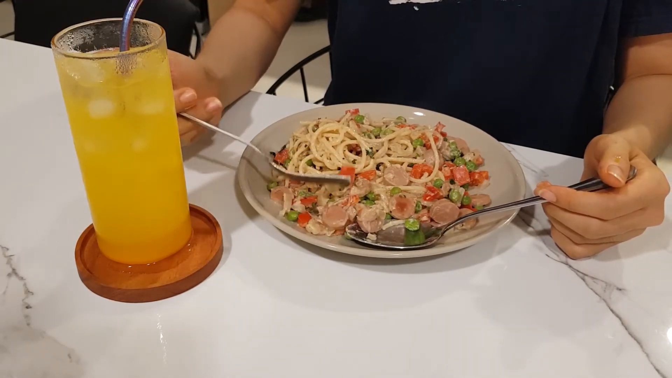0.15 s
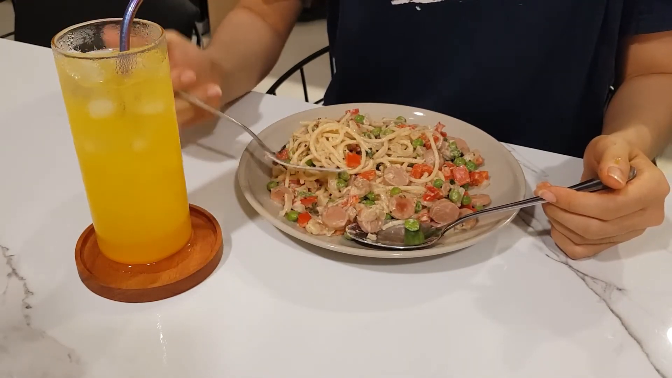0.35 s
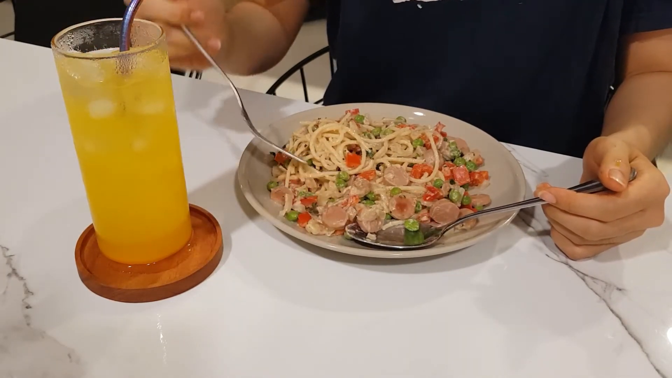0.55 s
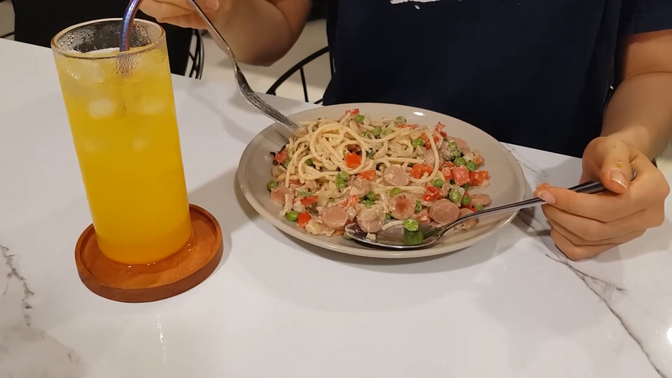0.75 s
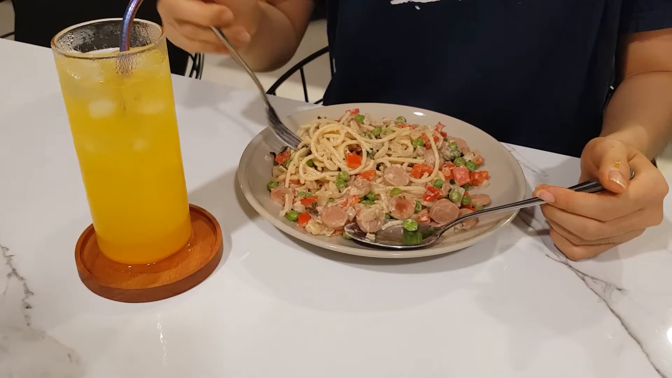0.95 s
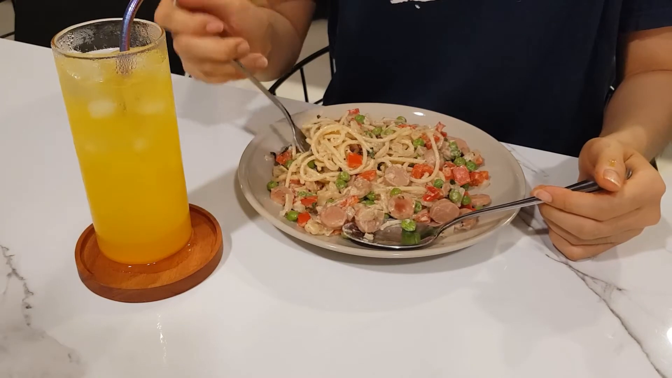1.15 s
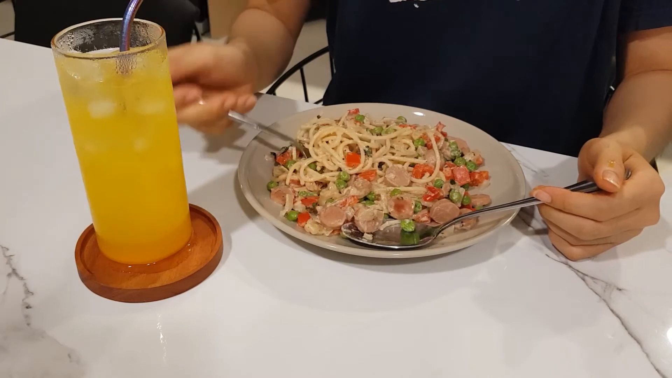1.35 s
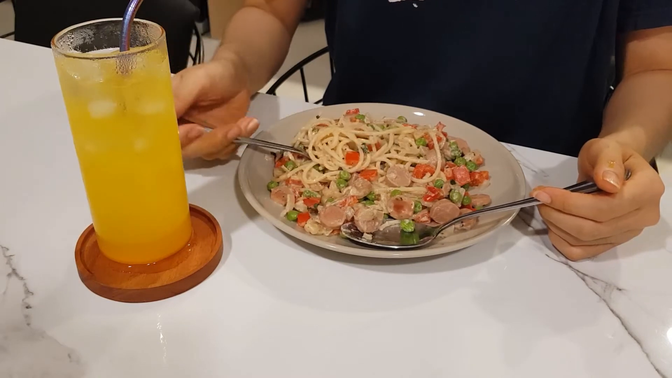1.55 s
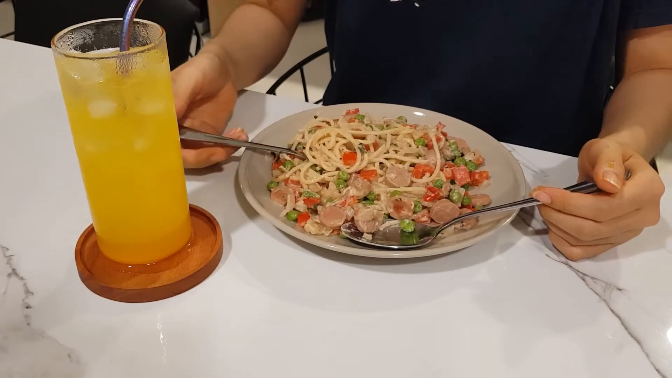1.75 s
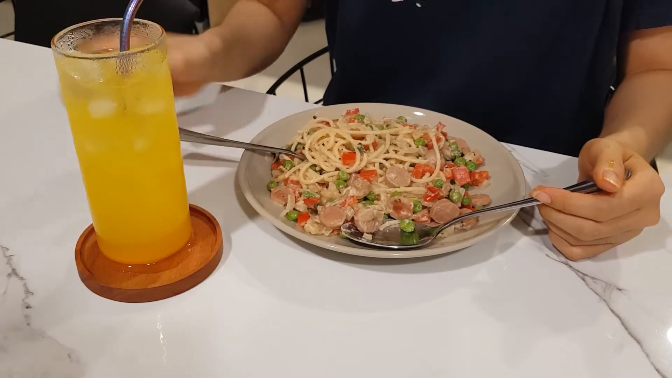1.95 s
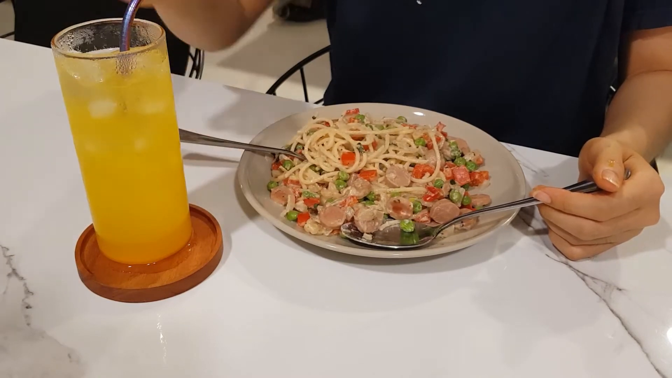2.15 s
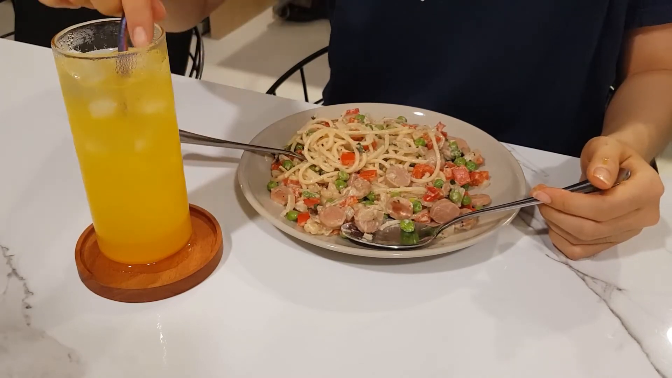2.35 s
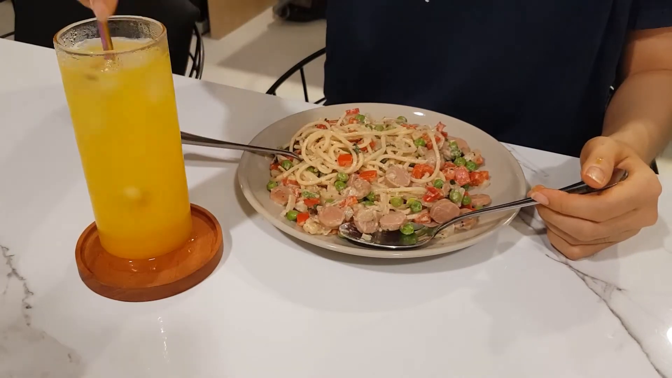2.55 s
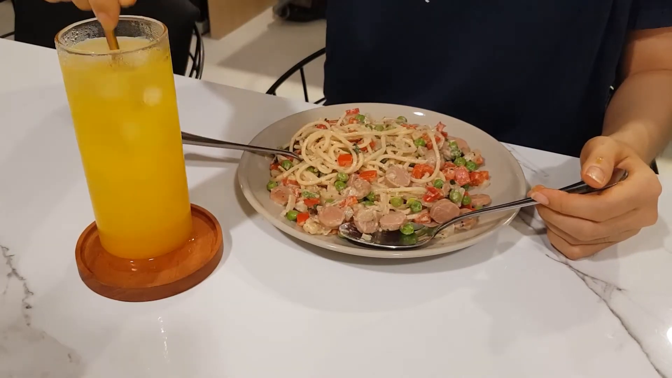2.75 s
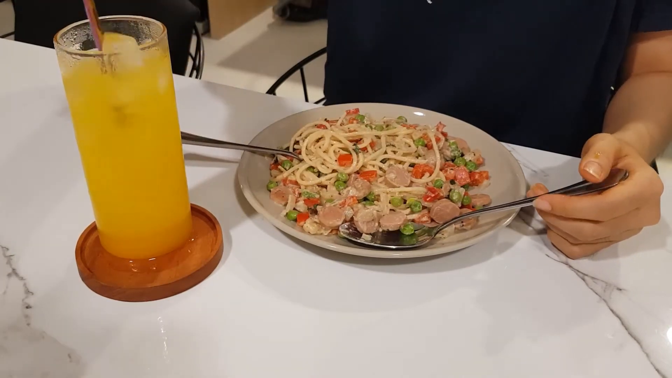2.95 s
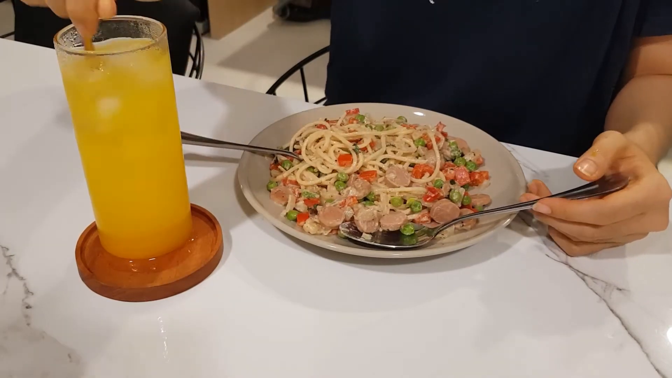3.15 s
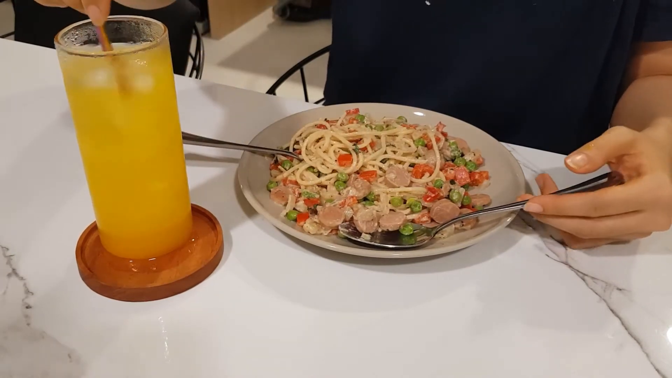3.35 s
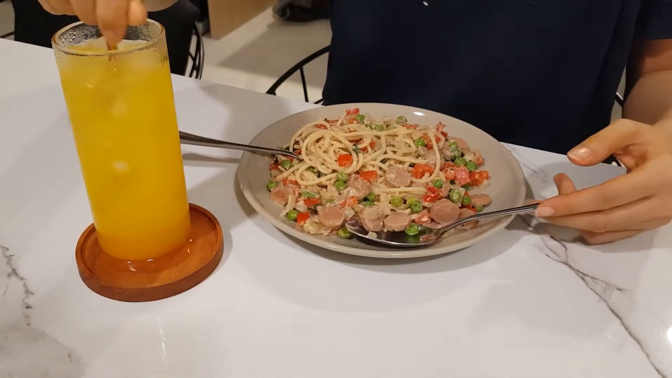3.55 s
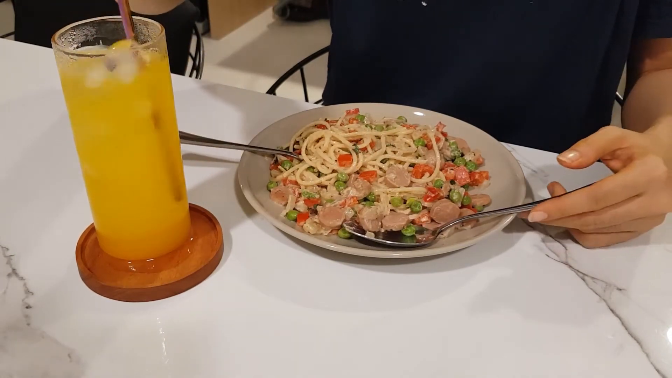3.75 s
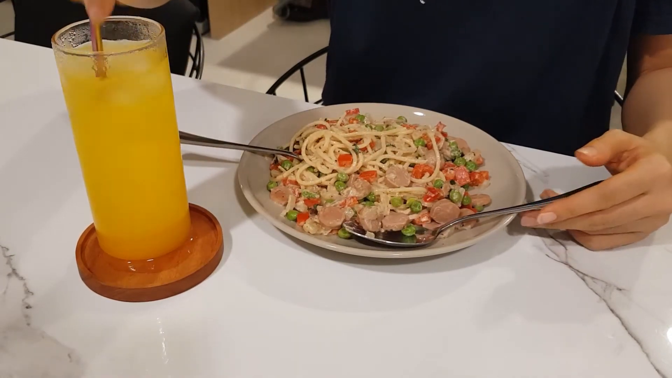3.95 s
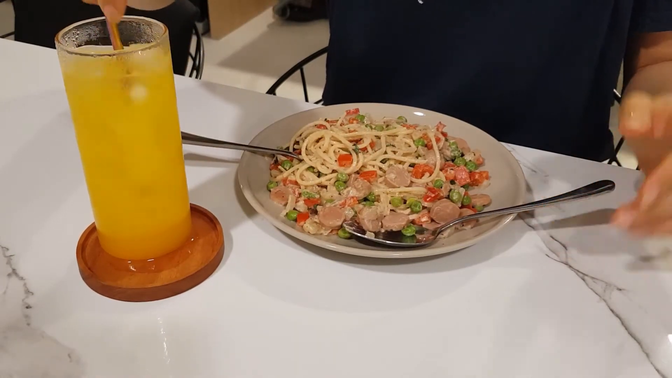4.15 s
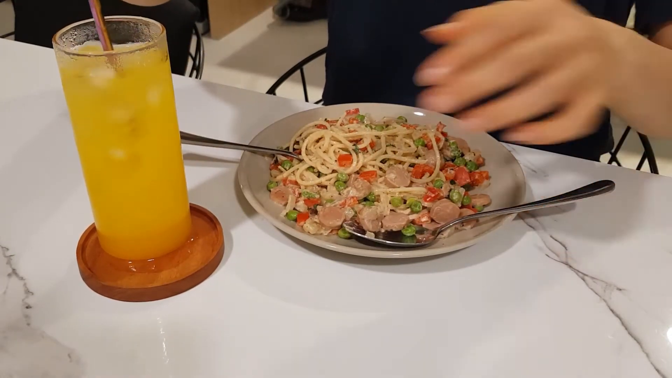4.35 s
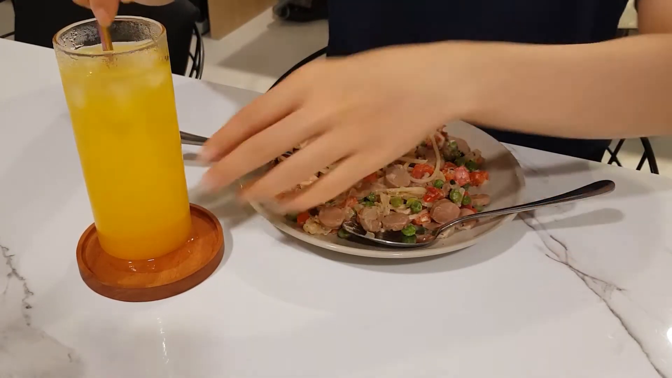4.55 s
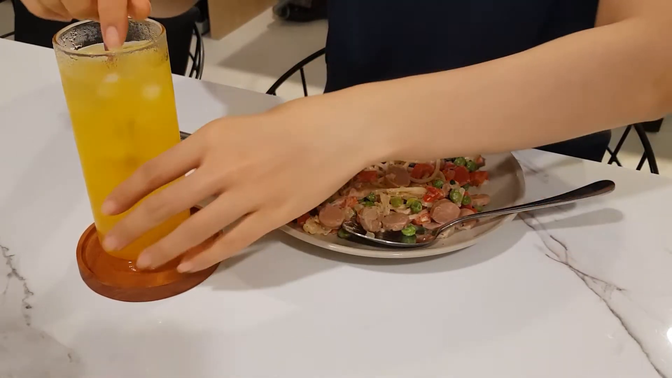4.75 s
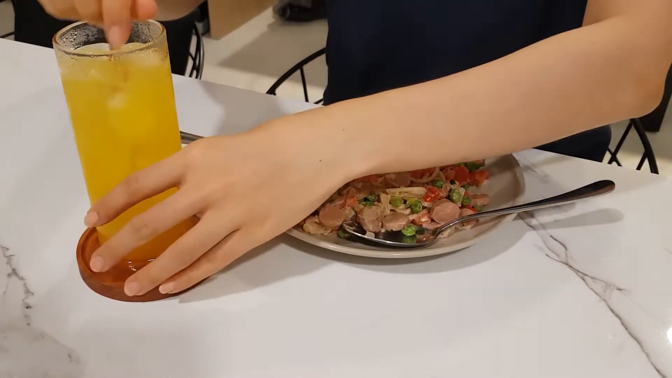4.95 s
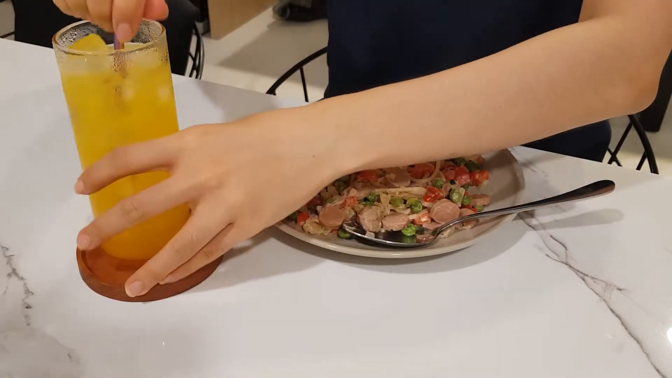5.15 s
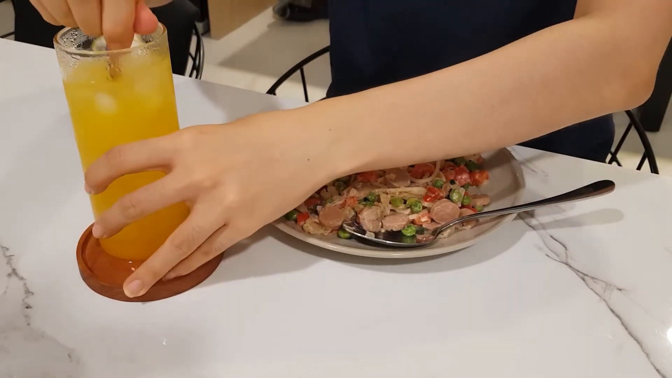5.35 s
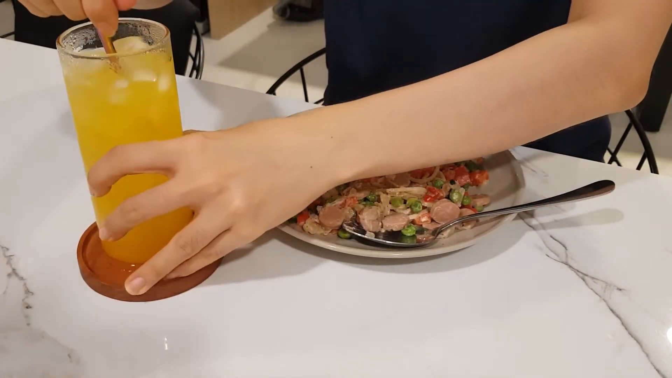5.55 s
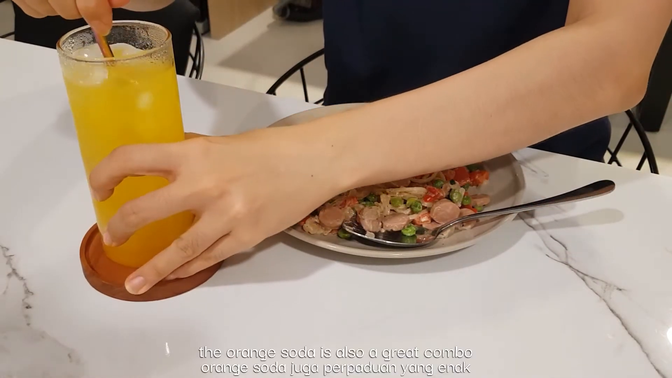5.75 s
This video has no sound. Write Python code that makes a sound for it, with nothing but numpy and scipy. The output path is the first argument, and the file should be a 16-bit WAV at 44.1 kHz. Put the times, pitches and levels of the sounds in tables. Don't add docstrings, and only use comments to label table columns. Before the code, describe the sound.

Ice cubes crack and clink in a full glass stirred with a metal straw, after a quiet start with faint cutlery taps.

```python
import sys
import numpy as np
from scipy import signal
from scipy.fft import rfft, irfft, next_fast_len
from scipy.io import wavfile
from scipy.ndimage import uniform_filter1d

SR = 44100
rng = np.random.default_rng(int(sys.argv[2]) if len(sys.argv) > 2 else 0)


def bounce(signal):
    frames = np.transpose(np.atleast_2d(signal))
    limited = np.clip(frames, -1, 1)
    pcm = np.round(limited * 32767).astype(np.int16)
    wavfile.write(sys.argv[1], SR, pcm)


def makeup_ratio(level_db):
    decades = np.asarray(level_db, float) / 20
    return 10 ** decades


N = 255339


def clock(n):
    return np.arange(n) / SR


def evened(x):
    return x / np.sqrt(np.mean(x ** 2) + 1e-20)


def peaked(x):
    return x / np.abs(x).max()


def read(points, hz):
    f, value = np.transpose(points)
    return np.interp(np.log(hz + 1), np.log(f + 1), value)


def add(mix, s, sound):
    part = mix[round(s * SR):][:len(sound)]
    part += sound[:len(part)]


def resonate(x, hz, width):
    r = np.exp(-np.pi * width / SR)
    return signal.lfilter([1 - r * r, 0, r * r - 1], [2, -4 * r * np.cos(2 * np.pi * hz / SR), 2 * r * r], x)


def colour(x, points):
    size = next_fast_len(N)
    gain = makeup_ratio(read(points, np.fft.rfftfreq(size, 1 / SR)))
    return irfft(rfft(x, size) * gain, size)[..., :N]


def decay(t60, t):
    return makeup_ratio(-60 * t / t60)


def ring(hz, t60, t):
    return np.sin(2 * np.pi * hz * t) * decay(t60, t)


def brushes(table, relative_width):
    out, t = np.zeros(N), clock(9000)
    for s, db, hz, length in table:
        rub = evened(resonate(rng.standard_normal(len(t)), hz, relative_width(hz)))
        add(out, s - .1, makeup_ratio(db) * rub * np.exp(-((t - .1) / length) ** 2 * 2))
    return out


# f/Hz, density/dB per Hz
AIR = [(33, -34), (41, -4), (100, -15.5), (200, -9), (330, -14), (600, -20.5), (1000, -27.5), (1900, -18),
       (2600, -20.5), (3500, -31.5), (7500, -39), (8300, -42.5), (9400, -37.5), (13000, -32.5)]
# f/Hz, correlation [0..1]
LIKENESS = [(40, 0.78), (130, 0.97), (300, 0.8), (600, 0.074), (1400, 0.49), (2200, 0.59), (4000, 0.079),
            (15000, 0.033)]
# f/Hz, left minus right/dB
TILT = [(60, -2.5), (240, -2), (950, -1), (3770, 1.5), (15000, -2)]
# f/Hz, phase/radians
LEAD = [(60, 0.61), (600, -1.22), (2200, -2.09), (4000, -2)]
# f/Hz, width/Hz, level/dB
HUM = [(86.6, 13, -80.5), (117, 28, -77.5), (175, 3.7, -78.5), (244.3, 29, -80.5)]
# f/Hz, width/Hz, level/dB
INSECTS = [(2123, 88, -65.5), (2153, 21, -77.5), (2219, 14.6, -66), (2251, 62, -67), (2380, 13, -78.5)]


def background():
    a, b = rng.standard_normal((2, N))
    size = next_fast_len(N)
    hz = np.fft.rfftfreq(size, 1 / SR)
    same = np.clip(read(LIKENESS, hz), -1, 1)
    tilt, lead = makeup_ratio(read(TILT, hz) / 2), np.exp(1j * read(LEAD, hz))
    left = tilt * lead * rfft(a, size)
    right = (same * rfft(a, size) + np.sqrt(1 - same ** 2) * rfft(b, size)) / tilt
    pair = irfft([left, right], size)[:, :N]
    swell = evened(uniform_filter1d(uniform_filter1d(rng.standard_normal(N), 3000), 3000))
    air = makeup_ratio(-67) * evened(colour(pair, AIR))
    air += makeup_ratio(-96.0 + 11.0 * swell) * evened(resonate(resonate(pair[::-1], 720, 490), 500, 700))
    for f, width, db in HUM + INSECTS:
        air += makeup_ratio(db) * evened(resonate(resonate(pair, f, width), f, 3 * width))
    return air


# t/s, peak level/dB, f/Hz
FORK = [(0.0294, -66, 1890), (0.2794, -68, 1520), (0.4468, -62.5, 1260), (0.9294, -73, 1390),
        (1.2194, -70, 1300), (1.4894, -62.5, 1220), (2.1594, -65, 1660), (2.2628, -54.5, 1180),
        (.447, -56, 2250)]


def fork_taps():
    out, t = np.zeros(N), clock(9000)
    for s, db, hz in FORK:
        push = rng.standard_normal(len(t)) * (decay(0.016, t) + makeup_ratio(-1) * decay(0.2, t))
        add(out, s, makeup_ratio(db) * peaked(resonate(resonate(push, hz, 910), hz, 910)))
    return out


# t/s, level/dB, f/Hz, length/s
SCUFFS = [
    (0.288, -76, 640, 0.07),
    (0.755, -76.5, 423, 0.079),
    (0.957, -76.5, 506, 0.075),
    (1.23, -71.5, 390, 0.05),
    (2.195, -76.5, 746, 0.062),
]


def far_scuffs():
    return brushes(SCUFFS, lambda hz: 0.39 * hz)


# t/s, level/dB, f/Hz, length/s
RUSTLE = [
    (1.116, -78, 9300, 0.023),
    (1.168, -74, 13000, 0.043),
]


def sleeve_rustle():
    return brushes(RUSTLE, lambda hz: 1200)


# t/s, vigour level/dB, crowding of the cubes on the wall/dB
STIR = [(2.55, -83, 10.5), (2.656, -69, -23), (2.804, -70.5, -5), (2.9, -51, -2), (3.045, -52.5, 1),
        (3.372, -49, -1), (3.62, -52, -21), (3.74, -47.5, -21), (4.084, -58.5, 3), (4.204, -45.5, -0.5),
        (4.33, -57, -9), (4.48, -55, -3), (4.866, -73.5, -35), (5.11, -67.5, 6.5), (5.2, -53, 0.5),
        (5.368, -47.5, -10), (5.548, -54, -3), (5.79, -62, 3)]
# f/Hz, density/dB per Hz
RATTLE = [(530, -23.5), (900, -8.5), (1130, -24.5), (1720, -12.5), (2360, -9), (3100, -10.5), (3650, -17),
          (4200, -9.5), (4980, -7), (5480, -20), (6180, -8.5), (6970, -16), (11600, -16), (14700, -28.5),
          (15700, -27), (16400, -54)]
# f/Hz, width/Hz, level/dB
GLASS = [(2340, 57, 23), (2590, 480, 4), (2980, 60, -12), (4570, 220, -13), (4985, 235, 6),
         (5600, 200, -15)]
# f/Hz, width/Hz
LOW_WALL = (815, 320)


def stir():
    s, rattle_db, crowd_db = np.transpose(STIR)
    wall_db = rattle_db + crowd_db
    low_db = -28 + 0.67 * rattle_db + 2.0 * crowd_db
    t = clock(N)

    def level(db):
        return makeup_ratio(np.interp(t, s, db, left=-120))

    strength = makeup_ratio(1.4 * np.minimum(rng.exponential(1, N), 3))
    ticks = strength * (rng.random(N) < 2200 / SR)
    grit = signal.lfilter([1], [1, -.98], ticks) * rng.standard_normal((3, N))
    wall = sum(makeup_ratio(d) * np.sqrt(40 / w) * resonate(grit[0], f, w) for f, w, d in GLASS)
    glass = level(wall_db) * evened(wall) + level(low_db) * evened(resonate(grit[0], *LOW_WALL))
    face = np.repeat(rng.integers(0, 9, N // 128 + 1), 128)[:N]
    faces = 0
    for k, hz in enumerate(np.geomspace(2000, 14000, 9)):
        faces = faces + evened(resonate(grit[1:] * (face == k), hz, 0.29 * hz)) * np.sqrt(hz)
    rattle = colour(evened(faces) + 1.6 * evened(grit[1:]), RATTLE)
    rumble = resonate(resonate(grit[0], 266, 45), 240, 350)
    return glass, level(rattle_db) * evened(rattle), level(0.24 * rattle_db - 59.5) * evened(rumble)


# t/s,
# cube ping level/dB, wall ring level/dB, cube f/Hz, crack level/dB
KNOCKS = [(4.74, -51, -51, 4800, -59), (4.7737, -57, -73, 4420, -58), (4.7984, -75, -58, 4420, -78),
          (4.8529, -75, -57, 2940, -82), (4.8629, -69, -51.5, 2850, -72), (4.8851, -69, -61, 2830, -59.5),
          (4.9072, -72, -80, 4760, -57.5), (4.9277, -55, -56, 2820, -58.5), (5.043, -59, -52, 2970, -60.5),
          (5.0654, -61, -49.5, 2950, -64), (5.1287, -61, -53, 6530, -46), (5.1389, -35.5, -34, 4740, -45),
          (5.1684, -43, -53, 4840, -52), (5.1836, -50, -51, 5000, -60), (5.2244, -53, -41, 4970, -56),
          (5.2367, -33.5, -61, 4800, -45), (5.2522, -33, -39, 5090, -37.5), (5.2598, -46, -46, 4500, -57),
          (5.2734, -33.5, -39, 4920, -44), (5.3078, -45, -43, 2970, -61), (5.3361, -28, -40.5, 4560, -54),
          (5.357, -40, -32, 4570, -42), (5.362, -31, -37, 4520, -42), (5.3814, -47, -34, 4470, -45),
          (5.3904, -43, -45, 4500, -43), (5.4194, -50, -38, 4500, -53), (5.453, -31.5, -42, 2960, -50),
          (5.4804, -52, -65, 5000, -59), (5.4945, -30, -45, 4880, -53), (5.5323, -29.5, -51, 4290, -44),
          (5.5387, -32.5, -46, 2740, -52), (5.5667, -41, -47, 4480, -46), (5.5979, -35.5, -50, 4340, -45),
          (5.6357, -42.5, -59, 2980, -57), (5.676, -54, -66, 6200, -58), (5.702, -45, -49, 5100, -48),
          (5.7256, -34, -44.5, 4900, -53), (5.7356, -51, -67, 4600, -46.5), (5.7536, -41, -49.5, 4600, -54),
          (2.587, -70, -62, 2860, -67.5), (2.6, -70, -51, 2980, -63), (2.6188, -44, -45.5, 5150, -49),
         (2.6524, -52, -50, 3000, -60), (2.6754, -51, -55, 5100, -60), (2.7124, -70, -58, 4370, -78),
         (2.7676, -62, -73, 2900, -79), (2.8, -41.5, -49, 4830, -57), (2.86, -48, -56, 2840, -59),
         (2.8857, -61, -47, 2980, -64), (2.8966, -29, -40, 4760, -43.5), (2.9186, -31.5, -44, 5200, -58),
         (2.9245, -33, -45.5, 4540, -44), (2.9581, -30.5, -49.5, 4430, -48), (2.9746, -60, -60, 5010, -52),
         (3, -56, -55, 4470, -41), (3.0205, -52, -45.5, 4650, -52), (3.031, -40, -64, 5100, -44),
         (3.064, -50, -49, 4600, -57), (3.0964, -34.5, -63, 4800, -57), (3.1053, -28.5, -41.5, 2860, -43),
         (3.13, -46, -59, 5050, -55), (3.1418, -29.5, -53, 4550, -43), (3.1556, -36, -49.5, 4600, -43),
         (3.2074, -25.5, -41, 4570, -25), (3.2264, -36, -45.5, 4500, -51), (3.264, -35, -48, 5740, -30.5),
         (3.2784, -32.5, -45, 4600, -35), (3.3194, -50, -62, 2900, -44), (3.3443, -37.5, -55, 5400, -41.5),
         (3.3731, -39, -41.5, 4660, -49), (3.3776, -45, -43, 2930, -48), (3.4052, -41, -53, 4700, -46),
         (3.4756, -42, -55, 2860, -62), (3.4835, -38, -47, 5020, -51), (3.5131, -32, -59, 4980, -34.5),
         (3.5219, -35, -42, 5720, -50), (3.5282, -30, -47, 4570, -44), (3.5447, -24.5, -35.5, 4800, -31.5),
          (3.5924, -55, -50, 4630, -42), (3.6035, -40, -43, 4300, -41), (3.6371, -39, -51.5, 4960, -49),
          (3.6704, -53, -51, 5240, -68), (3.6857, -53, -41, 6330, -60), (3.69, -50, -59, 4500, -53),
          (3.716, -27.5, -42, 5160, -30), (3.7343, -45, -40, 5050, -45), (3.7434, -45, -46, 5050, -39),
          (3.7522, -30.5, -42.5, 5000, -41.5), (3.7624, -47, -56, 4930, -55), (3.77, -54, -38.5, 3050, -44),
          (3.781, -27, -37.5, 4970, -34), (3.9464, -45, -45, 2950, -57), (3.9937, -43, -67, 2830, -61),
          (4.0027, -58, -55, 4100, -52), (4.0314, -54, -46.5, 2970, -54), (4.1005, -33, -36.5, 4140, -44.5),
          (4.1428, -26, -36.5, 5080, -37.5), (4.1712, -29.5, -40, 5930, -41),
          (4.1919, -44, -28.5, 4800, -41), (4.2081, -40, -41.5, 4450, -36), (4.2363, -34, -54, 5200, -52),
          (4.2828, -38, -47, 2780, -49), (4.3765, -35.5, -47, 2900, -67), (4.4013, -26, -48, 6010, -40),
          (4.4206, -27.5, -62, 4370, -39), (4.4404, -34, -51, 4480, -52), (4.4501, -42, -44, 2920, -53),
          (4.4564, -34, -45, 4800, -45), (4.4802, -39, -48.5, 4480, -51), (4.5765, -45, -45.5, 5520, -51),
          (4.586, -38, -50, 4520, -52), (4.6364, -55, -54, 2970, -68), (4.6702, -50.5, -54.5, 4540, -64),
          (4.6783, -50, -56, 2970, -63), (4.7044, -40.5, -45, 4430, -54.5), (4.7244, -64, -61, 2930, -60),
          (3.197, -47, -56, 4930, -48), (3.707, -61, -49, 2930, -57), (4.3832, -47, -50, 7050, -62),
         (2.9285, -31, -52, 4540, -36.5), (3.2005, -54, -62, 8960, -53), (3.228, -48, -60, 9600, -49),
         (3.4915, -39, -53, 5000, -54), (3.5385, -29, -51, 4280, -48), (4.4182, -38, -50, 6500, -41),
         (4.4855, -44, -48, 4530, -60), (5.1875, -41.5, -58, 3520, -59), (5.229, -43, -50, 2900, -54),
         (5.619, -53, -57, 6180, -66), (5.7095, -46, -59, 4200, -54)]
# f/Hz, width/Hz, level/dB
STRAW = [(9300, 2100, 26.5), (11200, 3300, -35), (11540, 1200, 28.5), (13030, 1300, 20.5)]
# f/Hz, level/dB, t60/s
UPPER = [(2923, -10.5, 0.067), (4480, -15, 0.037), (5090, -12.5, 0.063), (7350, -23, 0.046)]
WALL_HZ = 2362
GRIP_S = 4.9


def straw_crack(noise, burst, spot, crack_db, t):
    high = signal.butter(2, 7000, "high", fs=SR, output="sos")
    tube = 0
    for (f, w, d), u, v in zip(STRAW, spot[4:], spot[8:]):
        tube = tube + makeup_ratio(d + 0.78 * u) * resonate(burst, f * (1 + 0.017 * v), w)
    crack = peaked(signal.sosfilt(high, burst) + makeup_ratio(-10) * tube)
    crack += makeup_ratio(crack_db - 8) * evened(resonate(noise, 10300, 250)) * decay(.15, t)
    crack += makeup_ratio(-31) * resonate(noise[::-1], 10500, 6000) * decay(0.27, t)
    return crack


def wall_ring(noise, spot, wall_hz, held, t):
    wall = ring(wall_hz, (0.085 - 0.032 * held) * makeup_ratio(1.8 * spot[12]), t)
    wall += makeup_ratio(-0.5) * ring(wall_hz + 90 * spot[3], 0.016, t)
    wall += makeup_ratio(-14) * evened(resonate(noise[1], wall_hz, 300)) * decay(0.13, t)
    wall += makeup_ratio(-17.0 + 1.8 * spot[1]) * ring(LOW_WALL[0] * (1.02 + 0.024 * spot[2]), 0.081, t)
    return wall


def knocks():
    out, t = np.zeros((3, N)), clock(4000)
    rung, apart, knock = out
    contact = t * decay(.0042, t)
    rows = KNOCKS
    for (s, cube_db, ring_db, cube_hz, crack_db), noise in zip(rows, rng.standard_normal((len(rows), 2, 4000))):
        spot = noise[0, -16:]
        held = s > GRIP_S
        wall_hz = WALL_HZ + 48.3 * held + 24.3 * spot[0]
        burst = noise * contact
        crack = straw_crack(noise, burst, spot, crack_db, t)
        ping = resonate(resonate(burst, cube_hz, 0.68 * cube_hz), cube_hz, 1.0 * cube_hz)
        cube = peaked(ping) + makeup_ratio(-8) * ring(cube_hz, 0.028, t)
        wall = wall_ring(noise, spot, wall_hz, held, t)
        upper = [makeup_ratio(d + 4.6 * u) * ring(f * wall_hz / WALL_HZ, t60, t)
                 for (f, d, t60), u in zip(UPPER, spot[4:])]
        swing = makeup_ratio(ring_db + 2.5) * (1 - np.exp(-t / (0.00066 + 0.00067 * held)))
        hit = makeup_ratio(crack_db + 12) * crack + makeup_ratio(cube_db + 3.5) * cube
        add(rung, s, swing * wall)
        add(knock, s, swing * sum(upper) + hit[0])
        unlike = makeup_ratio(-13.5) * spot[11] * wall + makeup_ratio(-23) * spot[12:] @ upper
        add(apart, s, makeup_ratio(-13) * hit[1] + swing * unlike)
    return out


# t/s, peak level/dB, f/Hz, t60/s
THUMPS = [(2.665, -53.5, 125, 0.41), (2.688, -53, 203, 0.16), (2.899, -56.5, 244, 0.13),
          (3.147, -48, 174.5, 0.2), (3.3, -80, 252, 0.29), (3.525, -45, 195, 0.2), (3.546, -40, 243, 0.17),
          (3.612, -45, 185, 0.22), (3.822, -42.5, 175, 0.4), (3.85, -50, 230.4, 0.92),
          (3.877, -45.5, 117, 0.17), (4.202, -78, 222, 0.11), (4.462, -53, 123, 0.28),
          (5.141, -51.5, 124.2, 0.54), (5.357, -61, 174, 0.39), (5.551, -58.5, 178, 0.76),
          (4.92, -58, 204, 0.26), (5.439, -55, 128, 0.18)]


def table_thumps():
    out, t = np.zeros(N), clock(9000)
    for s, db, hz, t60 in THUMPS:
        t60 = max(t60, .02)
        push = rng.standard_normal(len(t)) * decay(t60, t) * (1 - np.exp(-t / 0.0025))
        wood = resonate(resonate(push, hz, 150), hz, 290)
        add(out, s, makeup_ratio(db) * peaked(wood + 0.069 * ring(hz, t60, t)))
    return out


# start t/s, length/s, level/dB, f/Hz
DRAGS = [(2.901, 0.038, -49, 2370), (3.201, 0.094, -61, 2420), (3.384, 0.018, -65, 2380),
         (3.685, 0.062, -48.5, 2430), (4.143, 0.093, -42.5, 2365), (4.453, 0.041, -48.5, 2344),
         (4.847, 0.034, -65, 2390), (5.246, 0.031, -40.5, 2440), (5.356, 0.026, -55, 2300),
         (5.384, 0.022, -52, 2390)]


def drags():
    out, t = np.zeros(N), clock(8000)
    for (s, length, db, hz), rub in zip(DRAGS, rng.standard_normal((len(DRAGS), 8000))):
        press = np.clip(t / 0.012, 0, 1) * decay(0.033, np.maximum(t - length, 0))
        song = evened(resonate(rub, hz, 27)) + makeup_ratio(-2.5) * evened(resonate(rub, 1.265 * hz, 60))
        add(out, s, makeup_ratio(db) * press * song)
    return out


# t/s, level/dB
SPOON = [
    (3.8147, -19.5),
    (3.8325, -27.5),
]
# f/Hz, drop level/dB, bounce level/dB, t60/s
CLASH_MODES = [(469, -18, -2, 0.085), (772, -33, -1, 0.038), (856, -2.5, -17, 0.019), (1203, -40, -9.5, 0.14),
               (1786, -1, -1, 0.048), (1800, -16, -31, 0.12), (1734, -17, -3, .1), (2980, -10, -9, 0.079),
               (4140, 13, -8, 0.0048), (4250, 8.5, 15.5, 0.008), (4480, -27, -13, 0.027), (5850, -14, 3.5, 0.041),
               (6500, -27, -8, 0.075),
               (7400, -29, -19, 0.12), (8280, -23, -12, 0.13), (9710, 8.5, 11, 0.0086), (11490, -19, -14, 0.08),
         (11000, -24, -5.5, 0.12), (12230, -27, 5, 0.037), (13420, -36.5, -18, .06),
         (14100, -23.5, -18, .05), (15040, -15, -4, 0.045)]


def spoon():
    out, t = np.zeros(N), clock(15000)
    for k, (s, db) in enumerate(SPOON):
        chatter = rng.standard_normal(len(t))
        clash = makeup_ratio(-30.0) * chatter * decay(0.0082, t)
        clash += makeup_ratio(-26.5) * evened(resonate(chatter, 1350, 870)) * decay(0.14, t)
        for hz, *blow_db, t60 in CLASH_MODES:
            shiver = evened(resonate(chatter, hz, 200 + 0.087 * hz)) * decay(3.3 * t60, t)
            clash += makeup_ratio(blow_db[k] - 5.5) * (ring(hz, t60, t) + makeup_ratio(-13) * shiver)
        add(out, s, makeup_ratio(db) * clash * (1 - np.exp(-t / 0.00056)))
    return out


def ports(x, left_db, lag):
    turn = np.exp(-2j * np.pi * np.fft.rfftfreq(N) * lag)
    return np.array([makeup_ratio(left_db / 2) * x, irfft(rfft(x) * turn, N) / makeup_ratio(left_db / 2)])


# delay t/ms, level/dB
CLOSE = [
    [(.7, -7), (1.6, -10), (2.9, -13)],
    [(.4, -8), (1.2, -8), (2.3, -12)],
]


def close(x):
    treble = signal.sosfilt(signal.butter(2, 2600, "high", fs=SR, output="sos"), x)
    return np.array([sum(makeup_ratio(db) * np.roll(treble, round(ms * SR / 1000)) for ms, db in side) for side in CLOSE])


# f/Hz, t60/s
ROOM = [(200, 0.21), (1000, 0.68), (4000, 0.51), (12000, 0.36)]


def room(x):
    taps = np.zeros((2, SR // 2))
    at = np.arange(150, SR // 2 - 20, 20)
    at = at + rng.integers(0, 20, (2, len(at)))
    np.put_along_axis(taps, at, rng.choice([-1., 1.], at.shape), 1)
    hz, t, z = signal.stft(taps, SR, nperseg=256)
    tail = signal.istft(z * decay(read(ROOM, hz)[:, None], t), SR, nperseg=256)[1]
    return signal.fftconvolve(x[None], tail / np.linalg.norm(tail[0]), axes=1)[:, :N]


def scene():
    behind = background()
    table = fork_taps() + far_scuffs() + sleeve_rustle()
    wall, rattle, rumble = stir()
    rung, apart, knock = knocks()
    table += table_thumps() + rumble
    glass = rung + makeup_ratio(-4.5) * (wall + drags())
    plate = spoon()
    direct = ports(glass, -.6, 3.4) + ports(knock, 3.2, 5.23) + ports(plate, -1.0, 0.87)
    direct += table * makeup_ratio([[-.7], [.7]]) + rattle
    wide = makeup_ratio(-2) * np.roll(resonate(plate, 1530, 1200), round(SR / 4 / 1600))
    direct += (apart - wide) * [[1], [-1]]
    far = room(glass + knock + rattle[0] + makeup_ratio(5.0) * plate + table)
    return direct + close(knock + plate) + makeup_ratio(-10) * far + behind


def top_cut(x):
    return signal.sosfilt(signal.butter(12, 16800, fs=SR, output="sos"), x)


# t/s, half length/s, level/dB
LEVEL_DIP = (2.659, .004, -25)


def record(dry):
    s, half, db = LEVEL_DIP
    dip = makeup_ratio(db * np.exp(-((clock(N) - s) / half) ** 4))
    edge = signal.firwin(301, 15900, window=("kaiser", 5), fs=SR)
    mix = signal.oaconvolve(dry * dip, edge[None], "same")
    return top_cut(mix)


dry = scene()
out = record(dry)
bounce(out)
```